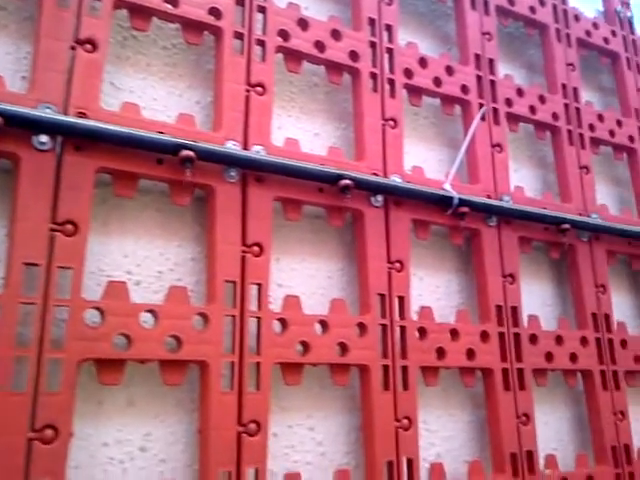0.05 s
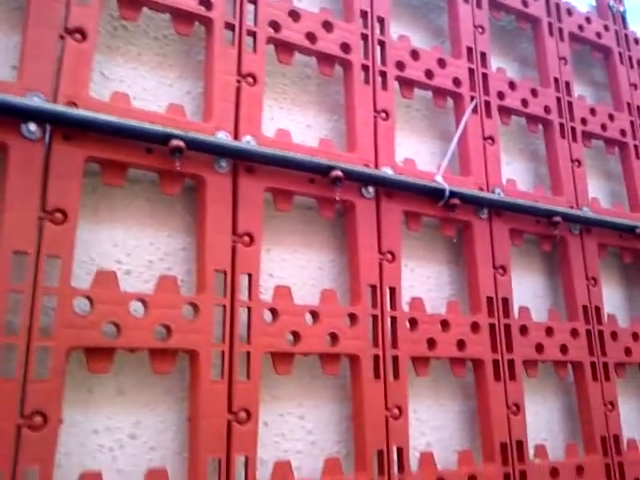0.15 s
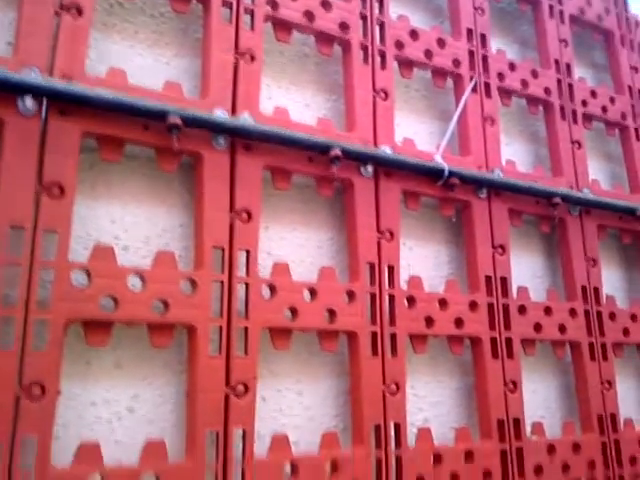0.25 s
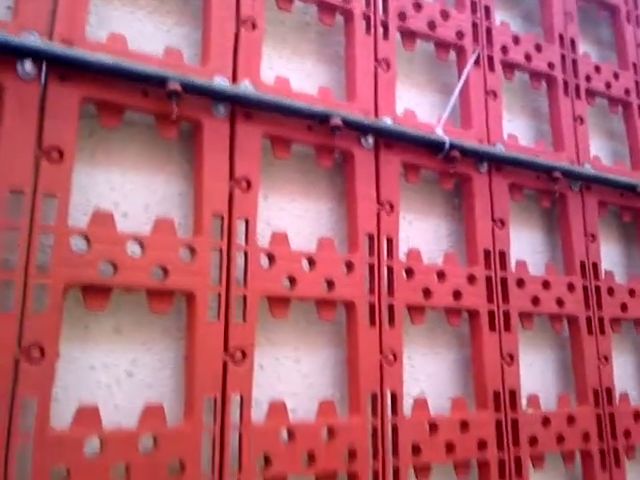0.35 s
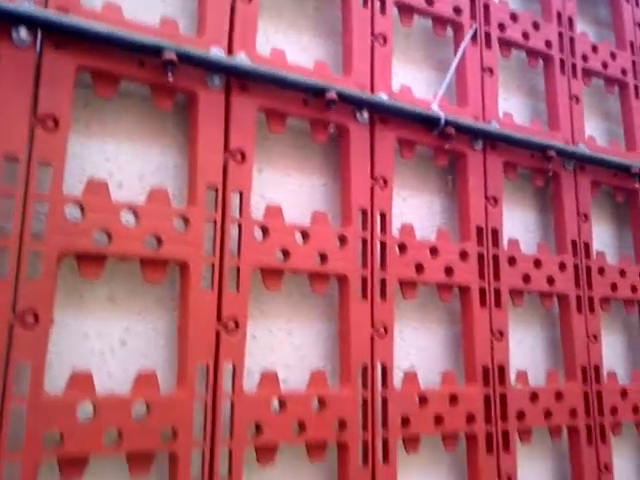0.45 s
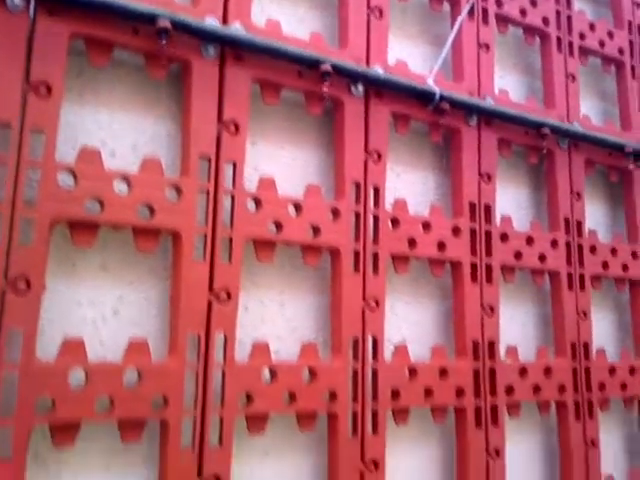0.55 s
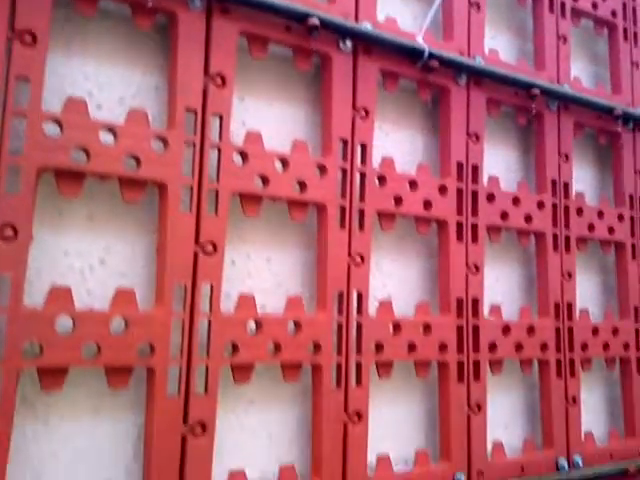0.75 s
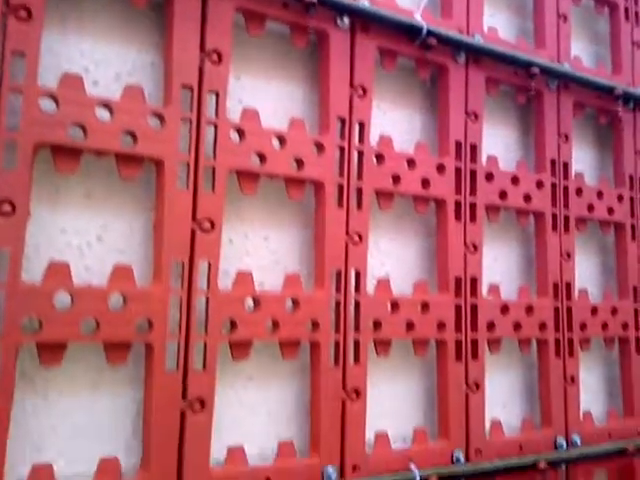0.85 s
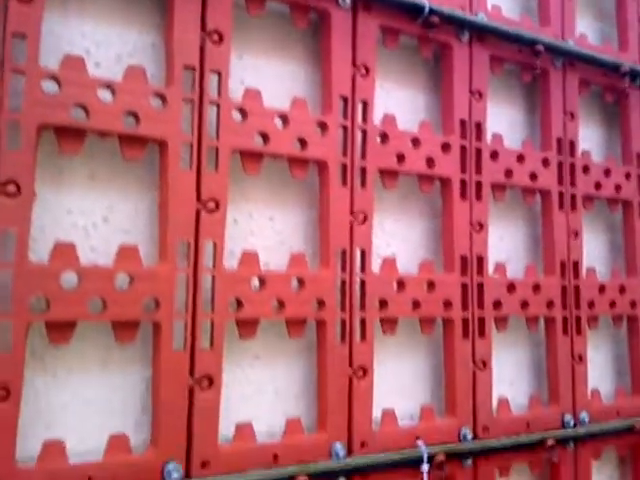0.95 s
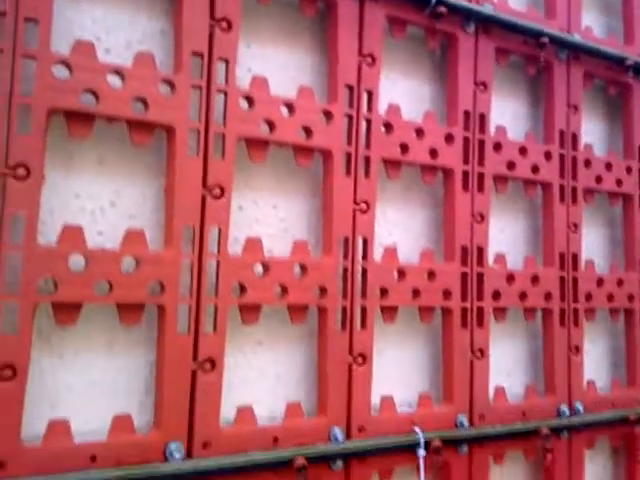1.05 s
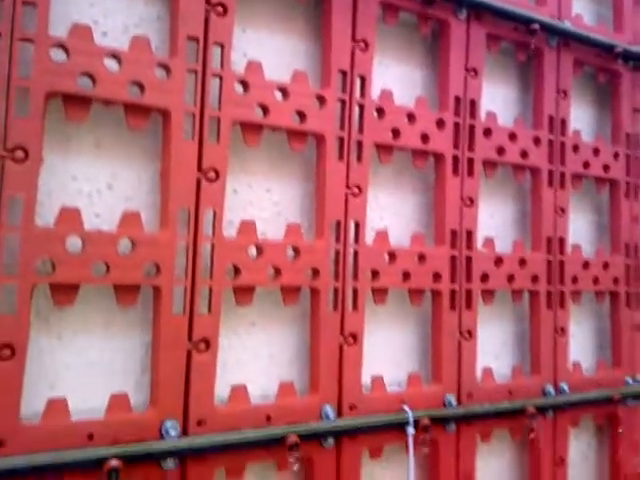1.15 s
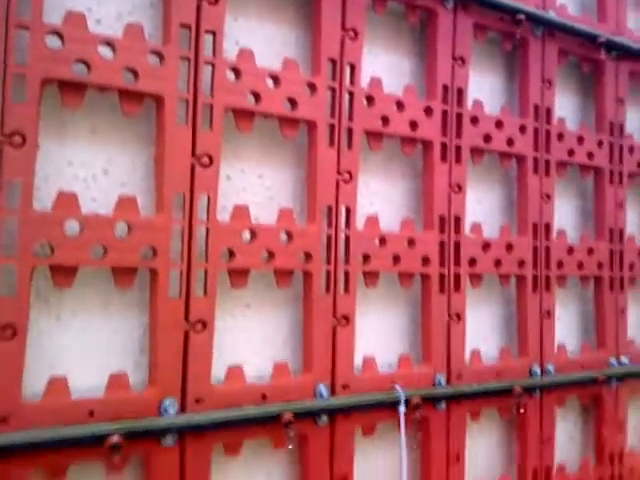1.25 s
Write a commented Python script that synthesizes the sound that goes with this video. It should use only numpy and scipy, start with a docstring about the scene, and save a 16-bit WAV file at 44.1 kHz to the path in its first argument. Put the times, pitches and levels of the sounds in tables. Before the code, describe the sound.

Water hisses softly and steadily in a plastic planter wall; a faint scuff, then two quick hollow knocks very near the microphone, a cluster of bright ticks, and another soft scuff. Mono, thin bass, dull top.

```python
"""Water hisses steadily in the drip pipes of a plastic planter wall: coloured noise with slow drift.
Small sharp ticks like drips on plastic: noise cracks and brief high rings, each with a diffuse tail.
Two scuffs, probably slow steps past the wall, swell out of the hiss: dull noise, then sandy noise.
Something hollow close to the microphone is bumped twice and rings briefly: knock, body modes, boom."""
import sys
import numpy as np
from scipy import signal
from scipy.fft import rfft, irfft, next_fast_len
from scipy.io import wavfile
from scipy.ndimage import uniform_filter1d, map_coordinates

SR = 44100
rng = np.random.default_rng(int(sys.argv[2]) if len(sys.argv) > 2 else 0)


def wrap_up_sound(samples):
    """Save the sound to the file named by the first command line argument, as 16-bit audio."""
    columns = np.atleast_2d(samples).T
    # keep every value between -1 and 1, then stretch to whole-number steps
    tamed = np.clip(columns, -1, 1)
    steps = np.round(tamed * 32767).astype(np.int16)
    wavfile.write(sys.argv[1], SR, steps)


N = 57330

# Scuffs: start_s, dull_db, dull_attack_s, dull_hold_s, sand_db, sand_peak_after_s, hollow_hz, hollow_db
SCUFF_EVENTS = [(0.179, -36.5, 0.0036, .045, -36, 0.11, 630, -45),
                (0.956, -38, 0.01, 0.092, -40.5, 0.13, 318, -41.5)]
# Dull rub of the sole, relative density: freq_hz, level_db_per_hz
DULL_SPECTRUM = [(40, -44), (110, -25.5), (165, -16), (240, -3), (340, -3), (600, -0.5), (1000, -1),
                 (1550, -3), (2800, -17.5), (7500, -20.5)]
# Sand under the sole, relative density: freq_hz, level_db_per_hz
SAND_SPECTRUM = [(90, -40), (160, -25), (240, -2), (420, 4), (650, -1.5), (1300, 1), (2300, 0), (3100, -4),
                 (3900, -6.5), (5200, -7), (7500, -13.5), (9000, -15.5)]
DULL_FALL_DB_PER_S, SAND_RISE_DB_PER_S, SAND_FALL_DB_PER_S = 108.5, 61.5, 49.5
DULL_PATCHY_DB, SAND_PATCHY_DB, SAND_GRAIN_DB = 3.5, 1.5, 1
HOLLOW_Q = 2.7

# Bumps: start_s, body_level_db, shove_length_s, shove_strength_db, knock_db, boom_db
BUMP_EVENTS = [(.3770, -27, .0158, -2, -20, -30), (.4350, -20.5, .0174, -1.3, -28, -27.5)]
# Modes of the hollow body: freq_hz, free_ring_db, t60_s, driven_db (while shoved)
BODY_MODES = [(183, -17.5, .2, -26.5), (245.2, -12, .2, -11.5), (330.8, -11.5, .25, -0.5),
              (365, -11, 0.18, -11.5), (452, -3.5, 0.33, 0), (607, -9.5, .11, -2), (751, -17, .14, -14),
              (846, -10, .16, -6), (1041, -9, .14, -29), (1198, -25, .12, -18.5), (1452, -19.5, 0.2, -17.5)]
# Knock of first contact, relative spectrum: freq_hz, level_db
KNOCK_SPECTRUM = [(30, -38), (115, -40.5), (170, -10.5), (230, 7.5), (330, 3), (500, -9), (700, 2.5),
                  (900, 3.5), (1400, -8), (1900, -17), (4000, -28.5)]
# Diffuse boom after a bump, relative spectrum: freq_hz, level_db
BOOM_SPECTRUM = [(30, -41), (110, -25.5), (170, -16), (245, -8.5), (280, -9), (345, 2.5), (400, -3.5),
                 (450, 4), (510, -10), (680, -14.5), (830, -8), (950, -22.5), (1500, -21.5), (3000, -37.5)]
BUMP_ATTACK_S, SHOVE_RELEASE_S = 0.0013, 0.00088  # time constants
RING_WANDER_CYCLES, RING_WANDER_KNOTS_PER_S = 0.04, 60
KNOCK_ATTACK_S, KNOCK_T60_S = 0.0016, 0.07
BOOM_ATTACK_S, BOOM_T60_S = 0.0076, 0.69
BOOM_HOLD_S, BOOM_EXTRA_T60_S = 0.093, 0.19  # a second decay joins after the hold

# Ticks: start_s, level_db, ring_hz
TICK_EVENTS = [(.057, -30.5, 6550), (.190, -27.5, 7020), (.6592, -26.5, 4420), (0.6607, -36, 6000),
               (0.7153, -22.5, 5030), (.7161, -16.5, 7620), (0.7225, -28, 5750), (0.7241, -23.5, 7240),
               (0.792, -33.5, 6450), (0.947, -28.5, 7000), (1.012, -32.5, 7130), (1.130, -30.5, 7040),
               (1.218, -26, 6460), (1.222, -29.5, 7100), (1.228, -31, 6300)]
# Crack of a tick, relative spectrum: freq_hz, level_db
CRACK_SPECTRUM = [(500, -31), (2400, -26.5), (4000, -8), (7500, 0), (9000, 1)]
TICK_ATTACK_S, TICK_RING_T60_S = 0.00029, 0.0047  # time constant, decay
CRACK_DB, CRACK_T60_S = 1.5, 0.007  # level re the ring's amplitude
WALL_DB, WALL_T60_S = -4.5, 0.049

# Steady hiss, relative density: freq_hz, level_db_per_hz
HISS_SPECTRUM = [(40, -29), (110, -13), (160, -20.5), (225, -8.5), (320, 0), (450, -3), (650, 0.5),
                 (900, -3.5), (1350, -4), (1900, -8.5), (2800, -11), (4200, -12.5), (5400, -14),
                 (7000, -10.5), (8800, -14)]
# Slow drift of the hiss: time_s, low_mid_gain_db, treble_gain_db
HISS_DRIFT_POINTS = [(0, 0.5, 2.5), (0.149, -3.5, 0.5), (.56, 1.5, -5), (.69, -2, -2.5), (0.789, 1.5, -0.5),
                     (.85, 0, -0.5), (.89, 1.4, -5), (.94, 2, -6), (1.02, -1.5, 1.5), (1.3, 1, 1)]
HISS_DB, HISS_PATCHY_DB = -46.5, 1.52  # before the drift
HISS_WAVER_DB, HISS_WAVER_KNOTS_PER_S = 1.46, 25
TREBLE_SPLIT_HZ = 1300

# Overall tone colour: freq_hz, gain_db
TONE_RESPONSE = [(20, -5), (100, -12), (170, 1), (7400, 1), (7750, -5), (8000, -18.5), (8350, -10.5),
                 (8700, -20), (9000, -33)]
TOP_HZ = 9060


def amp(db):
    """Decibels to gain."""
    return 10 ** (np.asarray(db) / 20)


def unit(x):
    """x at rms 1."""
    return x / np.sqrt(np.mean(x ** 2) + 1e-20)


def along(points, hz):
    """Interpolate (freq_hz, value) points on a log frequency axis."""
    point_hz, value = np.transpose(points)
    return np.interp(np.log(hz + 1), np.log(point_hz + 1), value)


def since(start_s):
    """Seconds since start_s, zero before it."""
    return np.maximum(np.arange(N) / SR - start_s, 0)


def fade(t_s, t60_s):
    """Exponential decay of 60 dB in t60_s."""
    return np.exp(-np.log(1000) * t_s / t60_s)


def wobble(knots_per_s):
    """Smooth random curve through normal knots."""
    knots = rng.standard_normal(int(N * knots_per_s / SR) + 4)
    return map_coordinates(knots, [np.arange(N) * knots_per_s / SR])


def filtered(x, response):
    """Zero-phase filter: spectrum of x times a gain over frequency."""
    size = next_fast_len(N + SR // 2)
    return irfft(rfft(x, size) * response(np.fft.rfftfreq(size, 1 / SR)), size)[:N]


def rush(spectrum, patchy_db=0):
    """Coloured noise of rms 1 with time-frequency patches of random gain."""
    z = signal.stft(rng.standard_normal(N), nperseg=512)[2]
    patches = uniform_filter1d(rng.standard_normal(z.shape), size=5, axis=0)  # across frequency
    patches = uniform_filter1d(patches, size=10, axis=1)  # across time
    noise = signal.istft(z * amp(patchy_db * unit(patches)), nperseg=512)[1][:N]
    return unit(filtered(noise, lambda hz: amp(along(spectrum, hz))))


def hollow_rub(hollow_hz):
    """Dull noise through one broad resonance, rms 1."""
    def resonance(hz):
        detuning = hz / hollow_hz - hollow_hz / (hz + 1)
        return 1 / (1 + (HOLLOW_Q * detuning) ** 2)
    return unit(filtered(rush(DULL_SPECTRUM), resonance))


def scuffs():
    """Friction noise: a dull, hollow rub at landing; a sandy slide peaks later and trails off."""
    out = np.zeros(N)
    for start_s, dull_db, attack_s, hold_s, sand_db, peak_s, hollow_hz, hollow_db in SCUFF_EVENTS:
        t = since(start_s)
        hollow = amp(hollow_db) * hollow_rub(hollow_hz)
        rub = amp(dull_db) * rush(DULL_SPECTRUM, DULL_PATCHY_DB) + hollow
        dull = amp(-DULL_FALL_DB_PER_S * np.maximum(t - hold_s, 0)) * rub
        swell_db = np.minimum(SAND_RISE_DB_PER_S * (t - peak_s), SAND_FALL_DB_PER_S * (peak_s - t))
        grain_db = SAND_GRAIN_DB * wobble(900)
        sand = amp(sand_db + swell_db + grain_db) * rush(SAND_SPECTRUM, SAND_PATCHY_DB)
        out += np.minimum(t / attack_s, 1) * (dull + sand)
    return out


def body_ring(start_s, length_s, shove_db):
    """Hollow-body modes: driven during the shove, then free decay with wandering phase."""
    t = since(start_s)
    shove = amp(shove_db) * np.exp(-since(start_s + length_s) / SHOVE_RELEASE_S)
    out = np.zeros(N)
    for mode_hz, ring_db, t60_s, driven_db in BODY_MODES:
        free = amp(ring_db) * fade(t, t60_s) * (1 - np.minimum(shove, 1))
        driven = amp(driven_db) * shove
        wander = RING_WANDER_CYCLES * wobble(RING_WANDER_KNOTS_PER_S)
        out += (free + driven) * np.sin(2 * np.pi * (mode_hz * t + wander))
    return (1 - np.exp(-t / BUMP_ATTACK_S)) * out


def knock(t):
    """First contact: a fast-decaying noise burst."""
    return np.minimum(t / KNOCK_ATTACK_S, 1) * fade(t, KNOCK_T60_S) * rush(KNOCK_SPECTRUM)


def boom(start_s):
    """Diffuse low noise that lingers, then decays faster."""
    t = since(start_s)
    linger = np.minimum(t / BOOM_ATTACK_S, 1) * fade(t, BOOM_T60_S)
    release = fade(since(start_s + BOOM_HOLD_S), BOOM_EXTRA_T60_S)
    return linger * release * rush(BOOM_SPECTRUM)


def bumps():
    """Each bump: a knock, a shoved and ringing hollow body, a diffuse boom."""
    out = np.zeros(N)
    for start_s, body_db, length_s, shove_db, knock_db, boom_db in BUMP_EVENTS:
        out += amp(body_db) * body_ring(start_s, length_s, shove_db)
        out += amp(knock_db) * knock(since(start_s))
        out += amp(boom_db) * boom(start_s)
    return out


def ticks():
    """Tiny hard impacts: a noise crack and a brief high ring, answered by the wall's noise tail."""
    out = np.zeros(N)
    for start_s, level_db, ring_hz in TICK_EVENTS:
        t = since(start_s)
        ring = fade(t, TICK_RING_T60_S) * np.sin(2 * np.pi * ring_hz * t)
        crack = amp(CRACK_DB) * fade(t, CRACK_T60_S) * rush(CRACK_SPECTRUM)
        out += amp(level_db) * (1 - np.exp(-t / TICK_ATTACK_S)) * (ring + crack)
    tail = rng.standard_normal(N) * fade(since(0), WALL_T60_S)
    tail /= np.linalg.norm(tail)  # unit energy
    return out + amp(WALL_DB) * signal.fftconvolve(out, tail)[:N]


def water():
    """Flow noise: patchy hiss whose low mids and treble drift separately."""
    hiss = rush(HISS_SPECTRUM, HISS_PATCHY_DB)
    low = filtered(hiss, lambda hz: 1 / (1 + (hz / TREBLE_SPLIT_HZ) ** 4))
    treble = hiss - low
    time_s, low_db, treble_db = np.transpose(HISS_DRIFT_POINTS)
    low_gain = amp(np.interp(since(0), time_s, low_db))
    treble_gain = amp(np.interp(since(0), time_s, treble_db))
    level = amp(HISS_DB + HISS_WAVER_DB * wobble(HISS_WAVER_KNOTS_PER_S))
    return level * (low_gain * low + treble_gain * treble)


def scene():
    """Sum of all sources, one channel."""
    return (scuffs() + bumps() + ticks() + water())[None]


def record(dry):
    """Overall tone: thin bass, level mids, steep fall near 8 kHz, silent from TOP_HZ up."""
    return filtered(dry[0], lambda hz: amp(along(TONE_RESPONSE, hz)) * (hz < TOP_HZ))[None]


dry = scene()
out = record(dry)
wrap_up_sound(out)
```